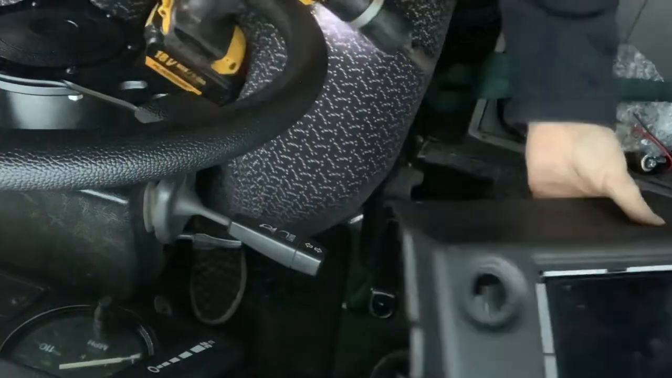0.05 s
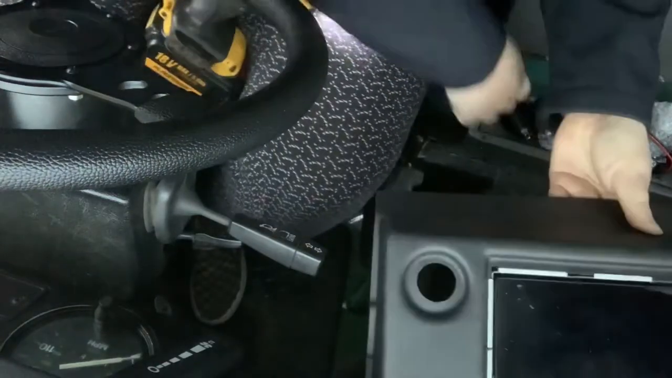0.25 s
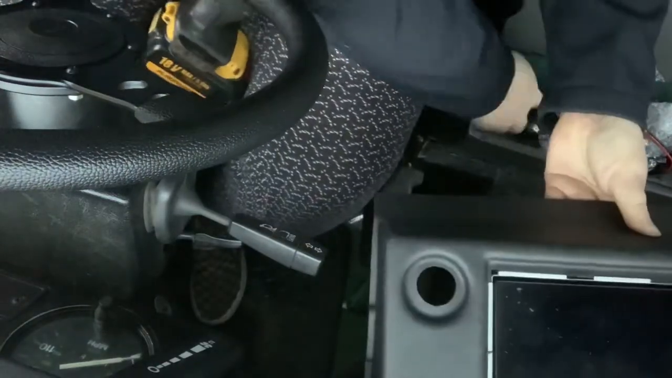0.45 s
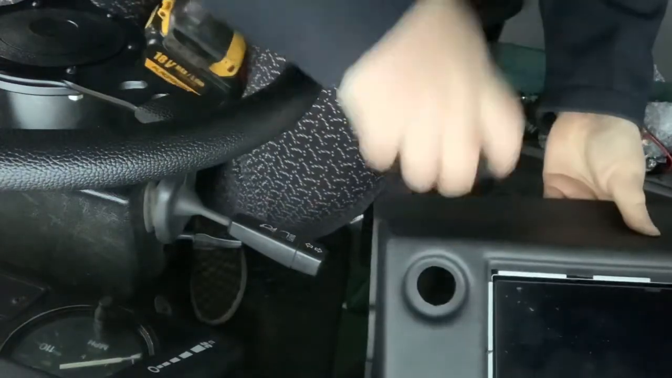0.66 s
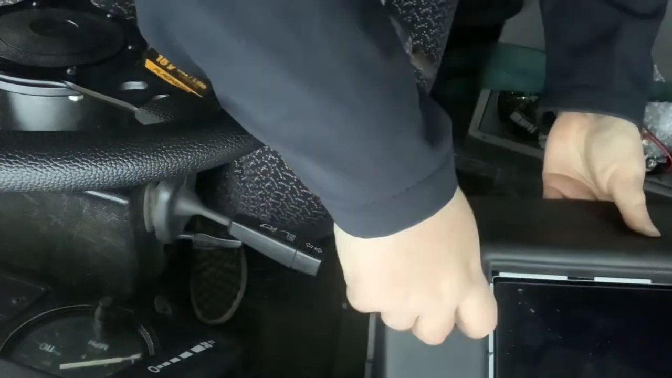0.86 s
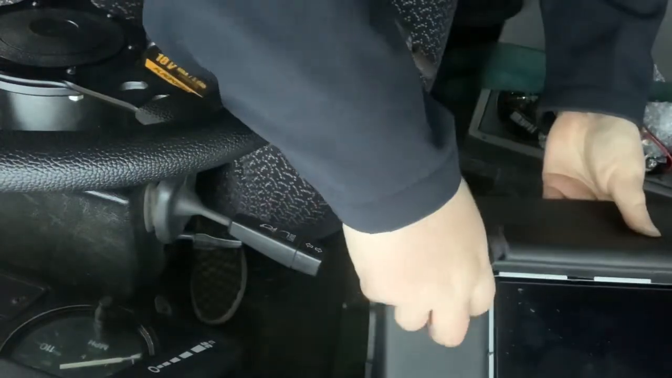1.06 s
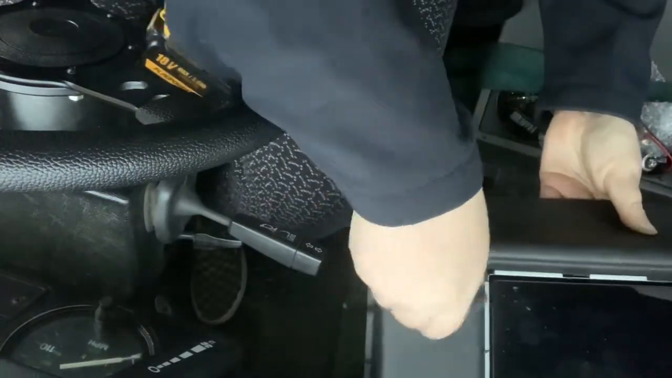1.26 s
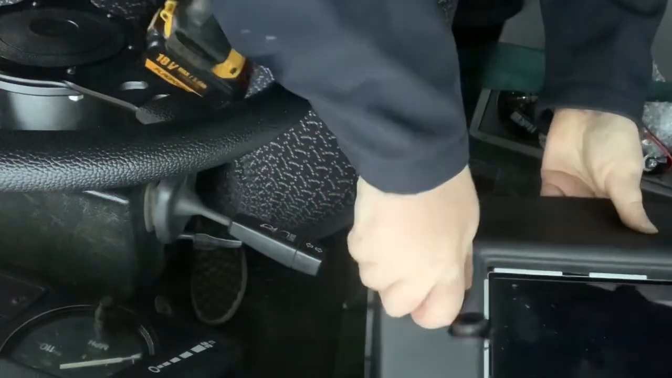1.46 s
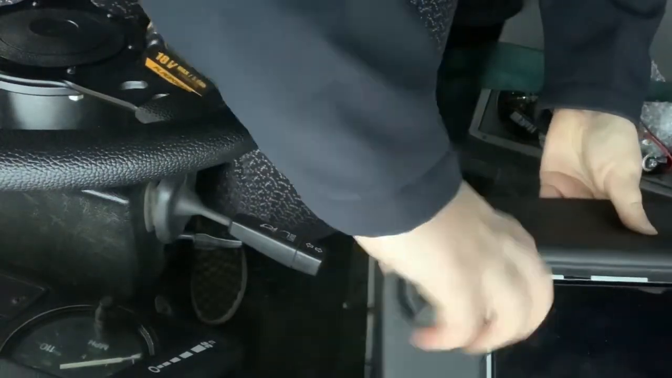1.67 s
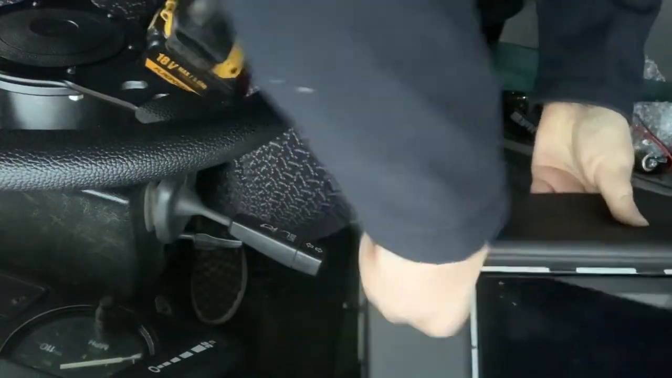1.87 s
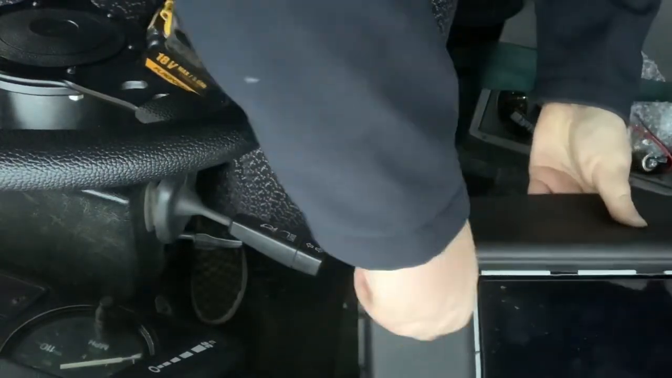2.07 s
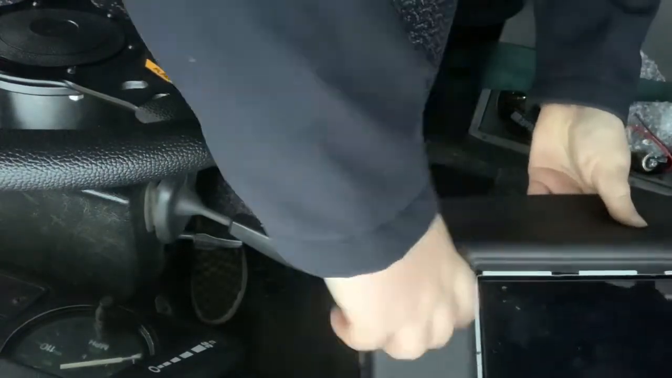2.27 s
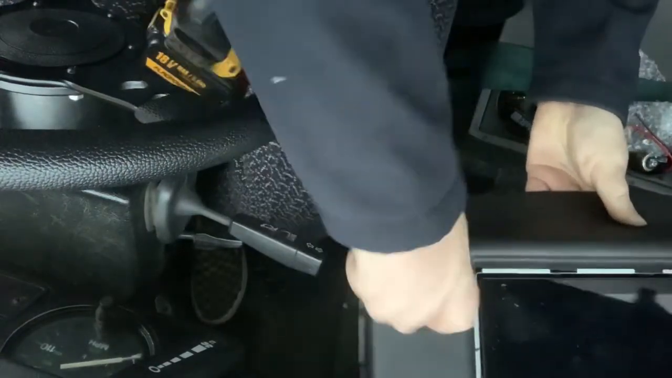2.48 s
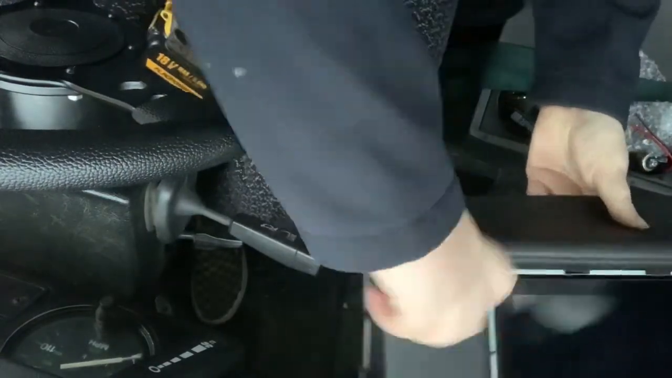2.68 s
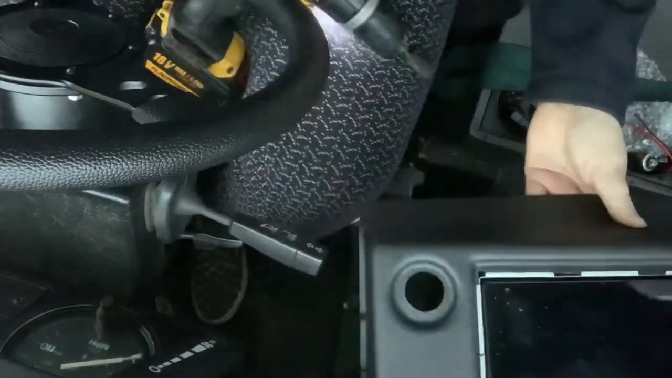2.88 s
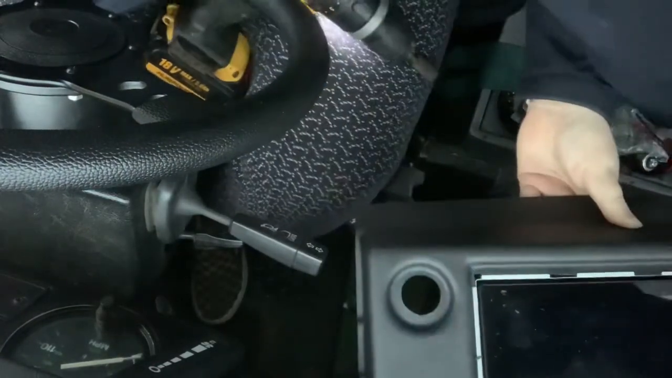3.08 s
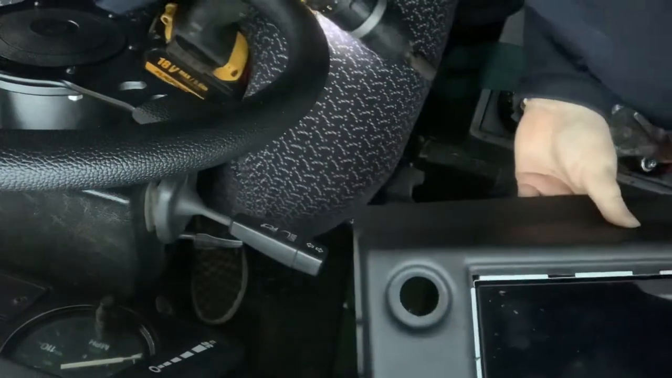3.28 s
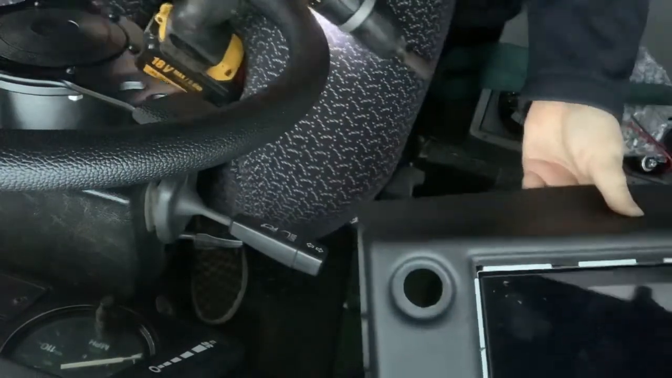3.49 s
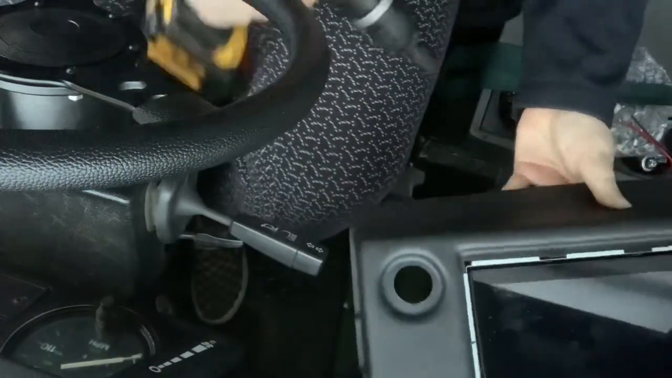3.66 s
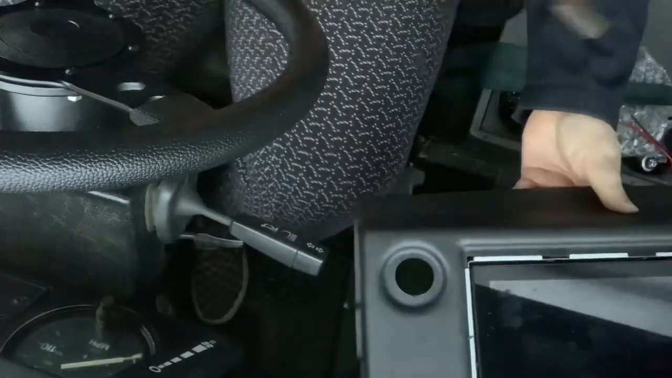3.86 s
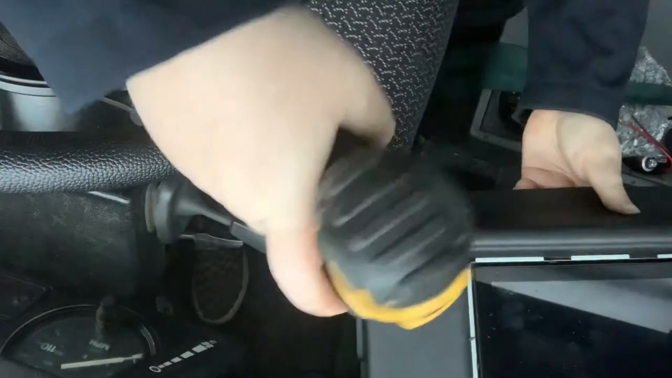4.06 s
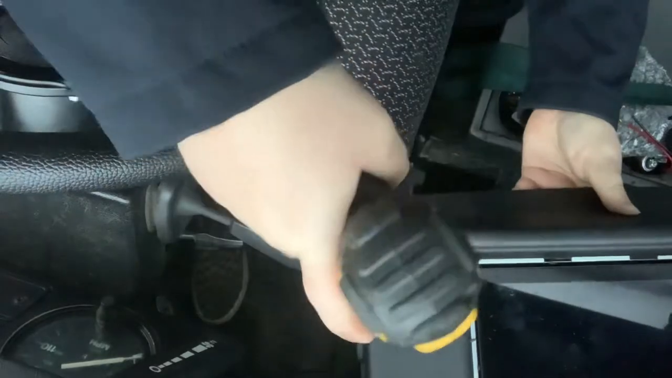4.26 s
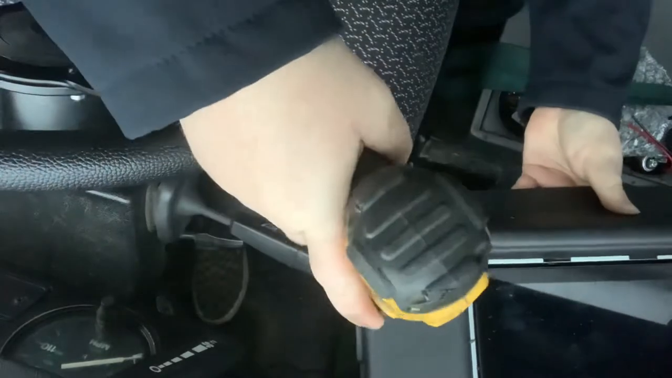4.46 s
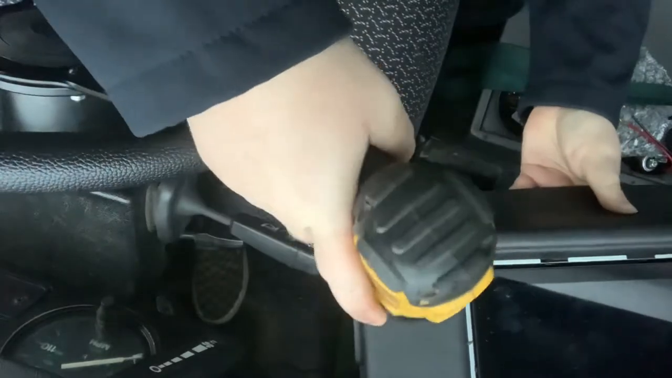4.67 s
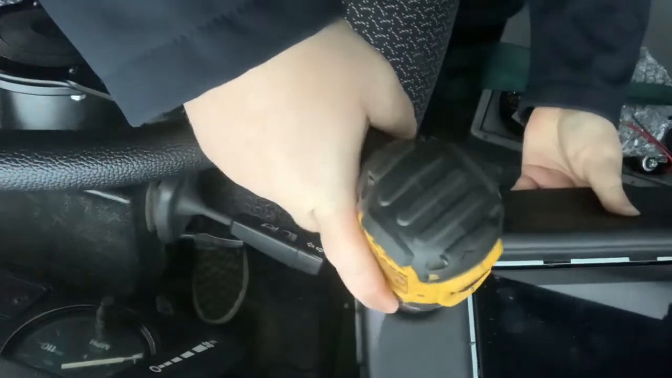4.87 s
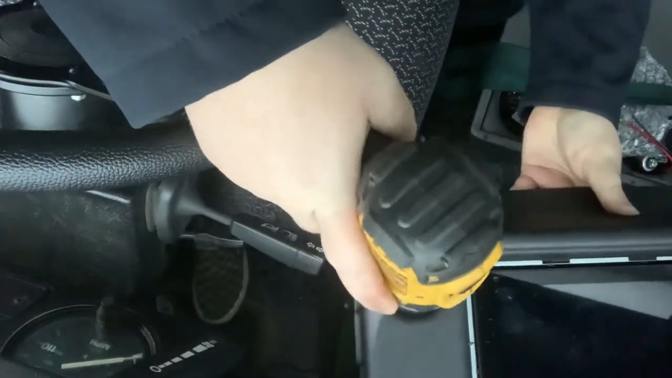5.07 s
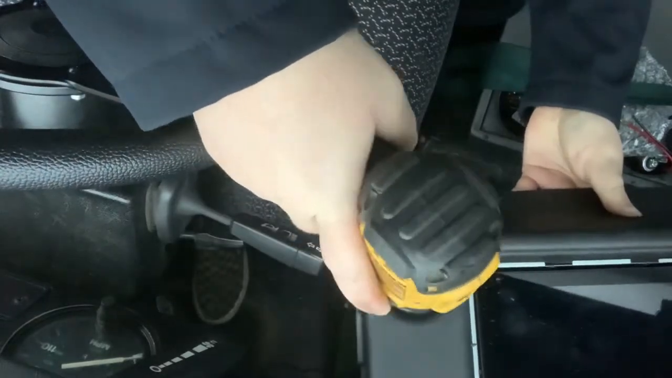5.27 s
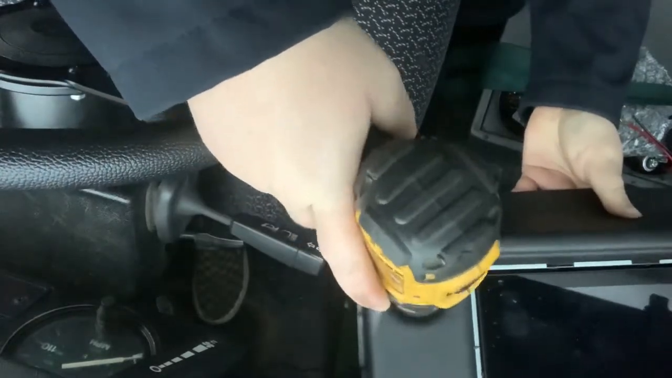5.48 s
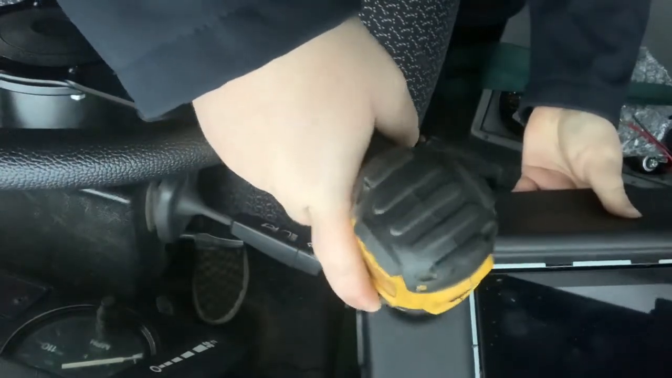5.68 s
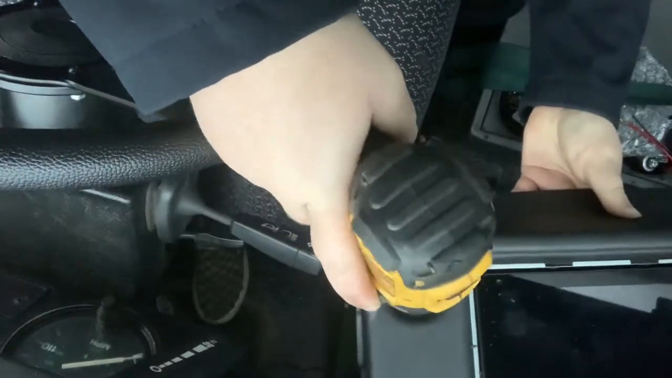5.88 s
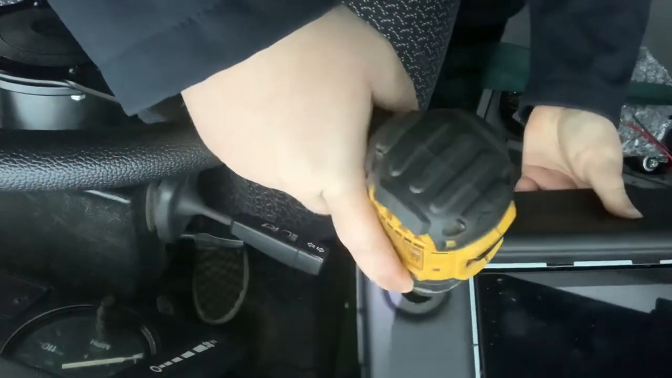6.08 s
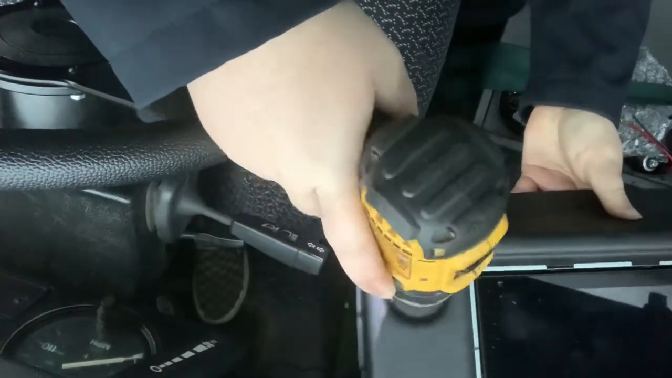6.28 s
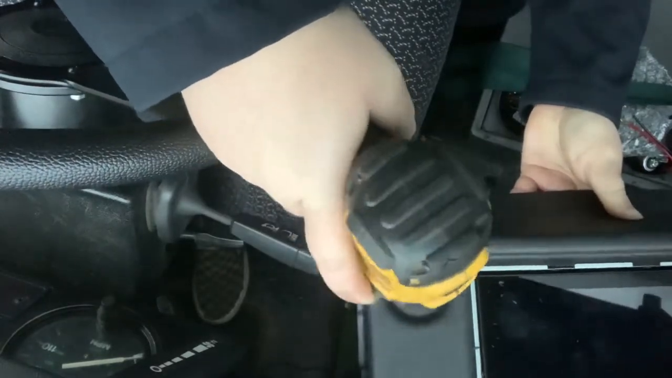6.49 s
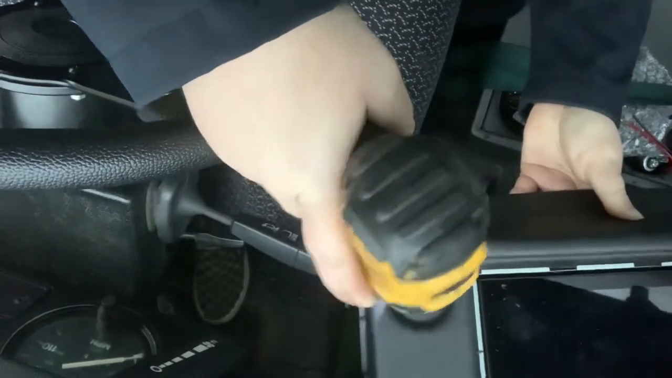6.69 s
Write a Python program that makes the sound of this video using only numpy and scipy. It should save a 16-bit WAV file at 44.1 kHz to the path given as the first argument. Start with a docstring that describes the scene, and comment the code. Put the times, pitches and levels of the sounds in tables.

```python
"""Cordless drill in a parked vehicle's cab.

A hand works at a plastic console panel: edges click, knuckles knock, skin rubs, a sleeve swishes.
A drill is lifted, bumps the steering wheel, is set on the panel and runs: its fan hisses, its gears
rasp in the housing and the bit chatters on the plastic. The small cab scatters the sound wide."""
import sys
import numpy as np
from scipy import signal
from scipy.fft import rfft, irfft, next_fast_len
from scipy.io import wavfile
from scipy.ndimage import uniform_filter1d, map_coordinates

SR = 44100
rng = np.random.default_rng(int(sys.argv[2]) if len(sys.argv) > 2 else 0)


def wav_record(signal):
    """Record a signal, one row per channel, as 16-bit PCM in the file named by sys.argv[1]."""
    frames = np.transpose(np.atleast_2d(signal))
    bounded = np.clip(frames, -1, 1)
    # unit amplitude maps onto the largest positive 16-bit level
    quanta = np.round(bounded * 32767).astype(np.int16)
    wavfile.write(sys.argv[1], SR, quanta)


N = 297229
TRIGGER_S, TOP_HZ = 4.336, 15740

# Each row: time in seconds, shaft turns per second. The motor sags under load.
MOTOR_SPEED = [(4.4, 279), (4.52, 279.3), (4.62, 277), (4.68, 277.8), (4.78, 275.5), (4.87, 278),
               (5.0, 278), (5.25, 274), (5.55, 274.8), (5.9, 275), (6.07, 272.3), (6.25, 274.3),
               (6.47, 272.3), (6.74, 272.8)]
def drill(run_up_s=0.033, rasp_db=2, rasp_per_s=240):
    """The motor turns fan and gears; tooth friction rings housing, gears, bit and console."""
    run_up = 1 - np.exp(-since(TRIGGER_S) / run_up_s)
    speed_hz = curve(MOTOR_SPEED) * run_up * (1 + 0.0014 * wobble(30) + 0.0018 * wobble(250))
    shaft = 2 * np.pi * np.cumsum(speed_hz) / SR
    carrier = shaft / 3 + wobble(16)  # the planet carrier rocks in its play
    teeth = grainy(500, 3.3)
    stick_slip = amp(rasp_db * wobble(rasp_per_s))
    rasp = unit(stick_slip * (1 + 0.13 * np.cos(carrier)) * (1 + 0.15 * np.cos(shaft + wobble(40))))
    motor = drive(-32, 0.12) * (fan(shaft) + housing(teeth, rasp, shaft, speed_hz[-1]))
    cutting = rasp * (gears(teeth) + grabs() + chatter(teeth)) + squeaks()
    return motor + bore() + waver(cutting + console(teeth, shaft) + bites())

# Each row: time in seconds, push on the bit in dB.
PUSH = [(4.37, -38.5), (4.47, -33.5), (4.57, -37), (4.76, -35), (4.84, -40.5), (4.9, -39.5), (5.0, -36.5),
        (5.05, -40.5), (5.1, -36.5), (5.21, -38), (5.3, -39), (5.66, -41), (5.8, -44.5), (5.87, -45),
        (6.0, -37), (6.08, -40), (6.24, -45.5), (6.37, -40), (6.46, -40), (6.51, -45.5), (6.61, -43.5),
        (6.68, -39.5)]
def drive(mean_push_db, db_per_db, unsteady_db=0):
    """Gain of a drill part, following the push on the bit."""
    return running() * amp(mean_push_db + db_per_db * about_mean(PUSH) + unsteady_db * wobble(9.2))

def running(rise_s=0.03):
    """0 before the trigger, 1 soon after."""
    return 1 - np.exp(-(since(TRIGGER_S) / rise_s) ** 2)

# Each row: frequency in Hz, noise density in dB.
FAN_SPECTRUM = [(15, -48), (25, -13), (199, -9.5), (268, -26), (652, -11), (1280, -7.5), (1600, -7),
                (2080, -4.5), (2720, -9), (3970, -9.5), (4300, -7), (5100, -7), (6280, -4), (6750, -7),
                (7500, -5), (9410, -7.5), (12300, -6), (14100, -6), (15700, -10.5)]
def fan(shaft):
    """Air hisses from the fan, pulsing faintly with each turn."""
    air = grainy(900, 0.41) * (1 + 0.014 * np.cos(shaft)) * amp(1.2 * wobble(50))
    return amp(3.5) * moving_echoes(coloured(air, FAN_SPECTRUM), bins=2, frames=10, calm_hz=11000)

# Each row: frequency in Hz, width in Hz, level in dB.
HOUSING_MODES = [(3040, 66, 2.5), (3340, 200, -5.5), (3696, 160, -1), (4480, 240, -1.5), (4980, 340, -2),
                 (5470, 310, -3), (6240, 160, -1.5), (7780, 530, -7)]
# Each row: multiple of shaft speed, level in dB.
WHINE_ORDERS = [(4.12, -23.5), (11, -18.5), (16.95, -14.5), (24.6, -35), (25.8, -21), (28.8, -19.5),
                (31.8, -30), (40.7, -32), (45.5, -26), (49.4, -24)]
def housing(teeth, rasp, shaft, final_speed_hz):
    """The housing whirrs with tooth friction; motor and teeth whine at multiples of shaft speed."""
    whirr = amp(-3.5) * rasp * resonate(teeth, HOUSING_MODES)
    whirr += amp(-13) * gear_mesh(shaft / (6 * np.pi), final_speed_hz / 3)
    return whirr * amp(0.56 * about_mean(PUSH)) + tones(shaft, WHINE_ORDERS) * amp(2.9 * wobble(10))

# Each row: frequency in Hz, level per line in dB.
MESH_SPECTRUM = [(1500, -23), (2500, -9), (3300, 5), (4200, -5), (5200, -4), (6300, 2), (7500, -11),
                 (10000, -38)]
def gear_mesh(turns, carrier_hz, spread_db=6, size=4096):
    """The same uneven teeth meet on every carrier turn: a dense comb of lines."""
    hz = np.arange(size // 2 + 1) * carrier_hz
    lines = amp(along(MESH_SPECTRUM, hz) + spread_db * rng.standard_normal(len(hz)))
    lines *= (hz > 0) & (hz < TOP_HZ)
    one_turn = irfft(lines * np.exp(2j * np.pi * rng.random(len(hz))))
    return unit(np.interp(turns, np.arange(size) / size, one_turn, period=1))

# Each row: frequency in Hz, width in Hz, level in dB.
LOW_GEAR_MODES = [(1879, 48, 0)]
HIGH_GEAR_MODES = [(2002, 62, -3), (2120, 100, -1.5), (2235, 190, -5.5)]
def gears(teeth):
    """Friction sustains two gear rings that grow with the push."""
    low = drive(-40.5, 0.6, unsteady_db=2) * sustained(teeth, LOW_GEAR_MODES, span_s=0.049)
    high = drive(-36.5, 0.63, unsteady_db=2) * sustained(teeth, HIGH_GEAR_MODES, span_s=0.037)
    return low + high

# Each row: middle in seconds, half length in seconds, pitch in Hz, level in dB, glide in Hz per second.
GRABS = [(4.4, 0.026, 1833, -30.5, 0), (4.455, 0.023, 2250, -34, 0), (4.461, 0.023, 2100, -25.5, -300),
         (4.524, 0.021, 2115, -26, -500), (4.594, 0.024, 2080, -28, -800), (4.66, 0.033, 2035, -37, -700),
         (4.697, 0.026, 2140, -28, 600), (4.743, 0.043, 1890, -26.5, -200),
         (4.784, 0.022, 2120, -28.5, -400), (4.891, 0.035, 2025, -25.5, -700),
         (4.99, 0.036, 1995, -39, -200), (5.087, 0.017, 2150, -26, -5000), (5.165, 0.041, 2005, -37, -700),
         (5.264, 0.026, 2095, -28, -500), (5.312, 0.018, 1860, -25.5, 1200), (5.41, 0.03, 2025, -31, -2),
         (5.51, 0.025, 2110, -29.5, -500), (5.534, 0.028, 1990, -33, -500), (5.628, 0.038, 2020, -29, 0),
         (5.718, 0.02, 1890, -31, 0), (5.915, 0.033, 1940, -31.5, 803), (5.995, 0.025, 2050, -29.5, -2500),
         (6.059, 0.027, 1925, -29, -2500), (6.323, 0.021, 2115, -32, 0), (6.381, 0.022, 2110, -25.5, -2200),
         (6.441, 0.017, 2060, -32.5, 0), (6.468, 0.024, 1875, -30.5, -1200),
         (6.552, 0.014, 2090, -30, -2000), (6.666, 0.016, 2140, -21.5, -5000),
         (6.722, 0.017, 1900, -29, -2500)]
def grabs(tremble_hz=27.2):
    """The bit grabs: the gear whine swells, trembles and mostly slides down."""
    out, t = np.zeros(N), np.arange(N) / SR
    tremble = tremble_hz * wobble(160)
    for s, half_s, hz, db, glide in GRABS:
        near = np.abs(t - s) < 3 * half_s
        age = t[near] - s
        phase = 2 * np.pi * np.cumsum(hz + glide * age + tremble[near]) / SR
        out[near] += np.sqrt(2) * amp(db) * np.exp(-(age / half_s) ** 2) * np.sin(phase)
    return out

# Each row: frequency in Hz, width in Hz, level in dB. Main mode first.
BIT_MODES = [(3982, 48, 1), (3740, 120, -10.5), (6300, 230, -9.5), (13600, 280, -18)]
# Each row: time in seconds, squeak peak in dB.
CATCHES = [(4.49, -25), (4.5138, -22), (4.522, -28), (4.534, -23.5), (4.592, -24), (4.868, -32),
           (4.885, -20), (4.903, -21), (4.92, -23.5), (5.091, -25), (5.1213, -20.5), (5.392, -31),
           (5.4058, -26), (5.5084, -24.5), (5.622, -18), (5.9862, -22), (6.334, -27), (6.375, -26.5)]
def chatter(teeth, surge_db=-11, half_s=0.042):
    """The bit rings with the push and surges around each catch."""
    surges = np.sqrt(sum((amp(db + surge_db) * swell(s, half_s)) ** 2 for s, db in CATCHES))
    gain = np.hypot(drive(-38.5, 0.84, unsteady_db=2), surges)
    return gain * sustained(teeth, BIT_MODES, span_s=0.042)

def squeaks(rise_s=0.0042):
    """At each catch the bit sticks for a few milliseconds and sings at its main mode."""
    out, t = np.zeros(N + SR), np.arange(SR // 20) / SR
    envelope = (t / rise_s) ** 2 * np.exp(2 - 2 * t / rise_s)
    for s, db in CATCHES:
        hz = BIT_MODES[0][0] * rng.normal(1, 0.0069)
        out[round(s * SR):][:len(t)] += amp(db) * envelope * np.sin(2 * np.pi * hz * t)
    return out[:N]

# Each row: frequency in Hz, width in Hz, level in dB.
CONSOLE_MODES = [(255, 63, 1.5), (356, 35, 3.5), (459, 43, 2), (566, 39, -5), (745, 44, -4.5)]
# Each row: multiple of shaft speed, level in dB.
HUM_ORDERS = [(1, -12), (2, -20), (3, -18.5)]
def console(teeth, shaft):
    """The pressed drill shakes the console, which rings and hums."""
    ring = amp(-4.5) * sustained(teeth, CONSOLE_MODES, span_s=0.12)
    hum = tones(shaft, HUM_ORDERS) * amp(5.9 * wobble(22))
    return drive(-41, 1) * (ring + hum)

# Each row: start in seconds, length in seconds, pitch in Hz, level in dB.
BITES = [(4.36, 0.035, 848, -40.5), (4.413, 0.036, 341, -37), (4.457, 0.087, 816, -39),
         (4.46, 0.087, 736, -39), (4.597, 0.08, 730, -39.5), (4.684, 0.019, 355, -34.5),
         (4.76, 0.06, 473, -42), (4.863, 0.063, 276, -46), (4.998, 0.13, 277.4, -39),
         (5.295, 0.064, 490, -41.5), (5.391, 0.026, 253.5, -34), (5.95, 0.21, 274, -42.5)]
def bites():
    """The panel sings briefly as the bit bites."""
    t = np.arange(N) / SR
    return sum(amp(db) * burst(s, length) * np.sin(2 * np.pi * hz * t) for s, length, hz, db in BITES)

# Each row: time in seconds, level in dB.
BORE_LEVEL = [(4.4, -64), (5.85, -62), (6.05, -42), (6.4, -45.5), (6.74, -45.5)]
# Each row: frequency in Hz, noise density in dB.
BORE_SPECTRUM = [(100, -7), (350, -7), (600, 0.5), (1100, 0), (1500, -12), (3000, -33)]
def bore():
    """The flutes scrape the wall of the deepening hole."""
    return running() * amp(curve(BORE_LEVEL)) * coloured(grainy(240, 2.5), BORE_SPECTRUM)

def waver(x, sway_s=0.0001, per_s=16):
    """Changing pressure on the bit bends the pitch of the rings."""
    n = np.arange(N)
    return np.interp(n + SR * sway_s * wobble(per_s), n, x)

# Each row: start in seconds, level in dB, hardness in dB per octave, spot pitch in Hz.
KNOCKS = [(0.168, -29, 0.5, 766), (0.177, -38, -5, 560), (0.211, -44.5, -4, 1610), (0.389, -45, -4, 2480),
          (0.421, -54, -2, 1890), (1.094, -56.5, -1.5, 1500), (1.472, -45, -1, 1870),
          (1.94, -47.5, -2, 2070), (1.975, -47, -7, 1300), (2.005, -48, -1.5, 2170),
          (2.106, -41, -10.5, 458), (2.471, -47.5, -6.5, 780), (2.513, -53, -6, 1490),
          (2.561, -56, 1, 1450), (2.572, -54.5, -1, 700), (2.663, -46.5, -6, 850), (2.695, -49, 0.5, 1750),
          (2.721, -35, -1.5, 966), (2.73, -39, -7, 624), (2.778, -32, -1.5, 600), (3.035, -43, -1.5, 1800),
          (3.41, -51, 0, 1090), (3.534, -60, 5, 1480), (3.673, -47, -2.5, 1470), (3.7, -32.5, -0.3, 4440),
          (3.737, -31, 1.5, 1670), (3.743, -34.5, -1, 1060), (4.222, -55, -4, 824), (4.266, -39, 2.5, 980),
          (4.302, -59, 2, 1870)]
# Each row: start in seconds, level in dB.
THUDS = [(0.356, -34), (0.384, -47), (0.836, -41), (1.303, -46), (1.471, -42), (1.879, -37), (1.976, -38.5),
         (2.122, -36), (2.565, -39), (3.701, -24.5), (3.738, -26), (3.772, -27), (3.829, -29), (3.846, -29),
         (4.267, -27), (4.301, -37.5)]
# Each row: frequency in Hz, gain in dB.
KNOCK_COLOUR = [(280, -8), (600, -1.5), (2200, 4), (4200, -0.5), (9000, -5)]
THUD_COLOUR = [(150, 0), (280, -3.5), (560, -24.5), (2200, -22.5), (4200, -29), (9000, -44)]
def knocks(pivot_hz=600, thud_spot_hz=1610):
    """Knuckles and tool knock, heavy or soft things thud; the light panel radiates little deep bass."""
    out, blows = np.zeros(N + SR), []
    for s, db, hardness, spot_hz in KNOCKS:
        tilted = [(hz, gain_db + hardness * np.log2(hz / pivot_hz)) for hz, gain_db in KNOCK_COLOUR]
        blows.append((s, db, tilted, spot_hz))
    blows += [(s, db, THUD_COLOUR, thud_spot_hz) for s, db in THUDS]
    for s, db, colour, spot_hz in blows:
        blow = panel_blow(colour, spot_hz)
        out[round(s * SR):][:len(blow)] += amp(db) * blow
    bass_cut = [(30, -21), (70, -12), (140, -2.5), (230, 0)]
    return filtered(out[:N], lambda hz: amp(along(bass_cut, hz)))

# Each row: frequency in Hz, level in dB, T60 in seconds.
PANEL_MODES = [(161, -9.5, 0.11), (211.3, -6, 0.11), (272, -0.5, 0.14), (329.4, 0.5, 0.11),
               (470, 0.5, 0.12), (590, -6, 0.079), (803, -3.5, 0.062), (980, -11, 0.025),
               (1440, -5.5, 0.052), (1544, -11, 0.11), (1884, -5, 0.058), (2143, 7.5, 0.014),
               (2550, -6, 0.04), (3090, -9.5, 0.035), (3610, 6, 0.016), (5340, 13.5, 0.013),
               (6340, 12, 0.015)]
# Each row: frequency in Hz, noise density in dB.
CRACK_SPECTRUM = [(100, -10), (400, 14), (1000, 3), (2500, -7), (5000, 0), (9000, -6.5), (16000, -11)]
def panel_blow(colour, spot_hz, give_s=0.0037, spot_db=15.5, ripple_hz=548):
    """The hollow panel gives, then rings and cracks; the struck spot adds its own pitch."""
    t = np.arange(SR // 8) / SR
    ripple_db = -1.5 * rng.standard_normal(64)  # from nearby surfaces
    def crack_gain(f):
        spot = spot_db * np.exp(-((f / spot_hz - 1) / 0.076) ** 2)
        ripple = np.interp(f / ripple_hz, np.arange(64), ripple_db) * f / (f + 900)
        return amp(along(colour, f) + spot + ripple + along(CRACK_SPECTRUM, f))
    hz, db, t60_s = np.transpose(PANEL_MODES)
    gains = amp(db + along(colour, hz) + rng.normal(0, 3.57, len(hz)))
    pitch_hz = hz * (1 + rng.normal(0, 0.031, len(hz)))  # hand pressure shifts the modes
    phase = 2 * np.pi * (pitch_hz[:, None] * t + rng.random((len(hz), 1)))
    ring = gains @ (np.sin(phase) * decay(t, t60_s[:, None]))
    noise = filtered(rng.standard_normal(len(t)), crack_gain)
    crack = noise * (decay(t, 0.021) + amp(-19) * decay(t, 0.11))
    return (amp(1.5) * ring + amp(18.5) * crack) * (1 - np.exp(-(t / give_s) ** 2))

# Each row: start in seconds, level in dB, brightness in dB per octave, three edge pitches in Hz.
CLICKS = [(0.465, -54, 9, 2520, 4970, 7000), (0.738, -37, 1, 2254, 3500, 6000),
          (0.768, -48, -6, 2160, 3440, 5600), (0.807, -39, -2, 1910, 2700, 3750),
          (0.822, -46.5, 1, 2200, 4230, 6460), (0.947, -69, 9, 2240, 5740, 7100),
          (1.044, -39.5, -0.5, 3460, 3570, 4600), (1.111, -59, -5, 2120, 3300, 6000),
          (1.176, -57, -0.5, 2190, 3050, 4540), (1.223, -41, 0.5, 1920, 4710, 5030),
          (1.244, -49.5, -1.5, 2190, 3540, 6700), (1.335, -59, -3, 2140, 3600, 5030),
          (1.42, -39, 3, 3600, 4950, 5200), (1.472, -44.5, -3.5, 1900, 3600, 5020),
          (1.879, -37.5, 0, 2430, 3370, 4590), (1.976, -44.5, -1, 2280, 3490, 5230),
          (2.182, -44, -3.5, 2280, 3370, 4900), (2.245, -48.5, -3.5, 1920, 3370, 5300),
          (2.304, -48.5, -2.5, 2140, 3600, 4520), (2.424, -56.5, 5, 2080, 4200, 5800),
          (2.496, -58.5, 8, 3600, 7000, 12500), (2.602, -49.5, -6, 1970, 3800, 4540),
          (2.757, -23.5, 4.5, 2010, 3690, 6030), (2.768, -27, -1, 2290, 3020, 5020),
          (3.26, -30.5, 1, 2500, 3510, 4670), (3.914, -56, 2, 2200, 2740, 4400),
          (3.995, -58.5, 3, 3030, 4430, 5960)]
# Each row: frequency in Hz, noise density in dB.
CLICK_SPECTRUM = [(100, -27), (260, -7), (500, -3), (900, -1.5), (1400, -4.5), (2100, 5.5), (2700, -1),
                  (3600, 1.5), (5200, 0), (7000, -0.5), (9000, -12), (15000, -16.5)]
def clicks(give_s=0.0039, pivot_hz=3500):
    """A hard edge gives and snaps: a dry tick and a short ring at its own pitches."""
    out, t = np.zeros(N + SR), np.arange(SR // 10) / SR
    give = 1 - np.exp(-(t / give_s) ** 2)
    tick_decay = decay(t, 0.019) + amp(-24) * decay(t, 0.081)  # snap, then the cab's echo
    fixed_energy = lambda x: x / np.sqrt(np.sum(x ** 2) / (SR // 100))
    for s, db, brightness, *pitches in CLICKS:
        tilt_db = lambda f: brightness * np.log2(np.maximum(f, 500) / pivot_hz)
        noise = filtered(rng.standard_normal(len(t)), lambda f: amp(along(CLICK_SPECTRUM, f) + tilt_db(f)))
        tick = amp(-1.5) * fixed_energy(noise * give * tick_decay)
        modes = sum(np.sin(2 * np.pi * (hz * t + rng.random())) for hz in pitches)
        ring = amp(-4.5) * fixed_energy(modes * give * decay(t, 0.026))
        out[round(s * SR):][:len(t)] += amp(db) * (tick + ring)
    return out[:N]

# Each row: middle in seconds, peak in dB, pitch in Hz, half length in seconds.
THUMPS = [(3.745, -11, 264, 0.0029), (4.276, -27.5, 360, 0.0037)]
def thumps(cab_hz=268, cab_db=5, cab_t60_s=0.11):
    """The heavy drill swings the panel; the cab's cross mode rings on, opposite at the two ears."""
    t = np.arange(N) / SR
    push, across = np.zeros(N), np.zeros(N)
    for s, db, hz, half_s in THUMPS:
        push += amp(db) * swell(s, half_s) * np.cos(2 * np.pi * hz * (t - s))
        age = since(s - half_s)
        envelope = decay(age, cab_t60_s) * (1 - np.exp(-age / half_s))
        across += amp(db + cab_db) * envelope * np.sin(2 * np.pi * cab_hz * (s - t))
    return np.array([push + across, push - across])

# Each row: frequency in Hz, level in dB, T60 in seconds.
WHEEL_MODES = [(174, -42, 0.63), (238, -24.5, 0.29), (277.5, -32, 0.3)]
def steering_wheel(bump_s=3.745, rise_s=0.028):
    """The bumped wheel's low modes build up and die away."""
    t = since(bump_s)
    modes = sum(amp(db) * decay(t, t60) * np.sin(2 * np.pi * hz * t) for hz, db, t60 in WHEEL_MODES)
    return modes * (1 - np.exp(-(t / rise_s) ** 2))

# Each row: time in seconds, rubbing effort in dB.
GRIP = [(0.0, -47.5), (0.17, -53.5), (0.8, -54.5), (0.89, -61.5), (1.0, -58), (1.1, -57.5), (1.68, -53.5),
        (2.66, -53.5), (2.78, -57.5), (3.45, -54), (3.76, -58), (4.16, -56.5), (4.3, -47)]
# Each row: middle in seconds, half length in seconds, level in dB.
SWISHES = [(0.046, 0.062, -54), (0.275, 0.24, -58), (0.613, 0.038, -53), (1.322, 0.026, -63),
           (1.593, 0.14, -67), (1.942, 0.13, -69.5), (2.187, 0.054, -67), (2.473, 0.16, -65.5),
           (2.997, 0.1, -51.5), (3.398, 0.045, -48.5), (3.527, 0.13, -49.5), (3.81, 0.24, -59)]
# Each row: start in seconds, length in seconds, level in dB.
SLIDES = [(0.004, 0.099, -47.5), (0.138, 0.053, -39.5), (0.59, 0.041, -73), (0.75, 0.04, -52.5),
          (1.022, 0.035, -61), (1.078, 0.039, -63), (1.899, 0.13, -56), (2.075, 0.036, -58),
          (2.221, 0.068, -57.5), (2.688, 0.061, -47), (3.021, 0.034, -51.5), (3.256, 0.011, -39.5),
          (3.392, 0.044, -60), (4.262, 0.012, -50)]
# Each row: frequency in Hz, noise density in dB.
RUB_SPECTRUM = [(18, -86), (30, -44), (135, -12), (167, -0.5), (260, 2.5), (642, -18), (779, -20),
                (981, -20), (1120, -28.5), (2160, -35.5), (2430, -36), (3000, -67), (3900, -54),
                (6600, -120)]
SCRAPE_SPECTRUM = [(60, -39), (300, -12), (800, 3.5), (2000, 2.5), (3000, -2), (5000, -0.5), (7500, -5.5),
                   (10000, -11.5), (16000, -17)]
SLEEVE_SPECTRUM = [(290, -19), (500, 0.5), (697, -13), (1040, -7.5), (1190, -13), (1500, -6.5), (2420, -12),
                   (5420, -3), (9260, -13.5), (13700, -11), (15800, -14.5)]
def handling():
    """Fingers rub the console and snag on its grain, a sleeve swishes, skin and cuff slide."""
    grip_db = about_mean(GRIP)
    rub = amp(-55.5 + grip_db) * (1 - running())
    sleeve = amp(-88) + sum(amp(db) * swell(s, half_s) for s, half_s, db in SWISHES)
    slide = sum(amp(db) * burst(s, length_s) for s, length_s, db in SLIDES)
    hollow = amp(1.5) * coloured(grainy(70, 2.1), RUB_SPECTRUM)
    skin = amp(-16.5) * coloured(grainy(240, 2.7), SCRAPE_SPECTRUM)
    snags = (amp(-25 + 0.58 * grip_db) * rub + amp(-9.5) * np.hypot(sleeve, slide)) * crackle()
    cloth = coloured(grainy(200, 1.6), SLEEVE_SPECTRUM)
    cloth = amp(1) * moving_echoes(cloth, bins=4, frames=5, calm_hz=14000)
    scrape = coloured(grainy(400, 1.7), SCRAPE_SPECTRUM)
    return rub * (hollow + skin) + snags + sleeve * cloth + slide * scrape

def crackle(per_s=84, spread_db=8, t60_s=0.021):
    """Tiny random snags of skin and cloth, very unequal in size, at rms 1."""
    starts = (rng.random(N) < per_s / SR) * amp(spread_db * np.clip(rng.standard_normal(N), -2, 2))
    envelope = signal.fftconvolve(starts, decay(np.arange(SR // 100) / SR, t60_s))[:N]
    return coloured(rng.standard_normal(N) * envelope, SCRAPE_SPECTRUM)

def moving_echoes(x, bins, frames, calm_hz, depth_db=3):
    """Echoes off moving hands and tool lift some pitches and sink others, least in bass and top."""
    hz, _, spectrum = signal.stft(x, SR, nperseg=512)
    field = rng.standard_normal(spectrum.shape)
    for _ in range(2):
        field = uniform_filter1d(uniform_filter1d(field, bins, axis=0), frames, axis=1)
    reach = hz / np.hypot(hz, 900) / (1 + (hz / calm_hz) ** 2)
    spectrum *= amp(depth_db * reach[:, None] * unit(field))
    return unit(signal.istft(spectrum, nperseg=512)[1][:N])

# Each row: frequency in Hz, share reaching the right ear first (negative: the left).
EAR_LAG = [(150, -0.25), (330, -0.65), (600, 1), (1100, 0), (2000, 0.75), (4500, 0.67), (6300, 0.0091),
           (8000, -.3), (11000, 0.13)]
def cab(source, width, lean):
    """Stereo from a direct sound plus scattered sound of like strength but unrelated detail."""
    direct, scattered = source(), source()
    size = lambda hz: amp(along(width, hz))
    balance = lambda hz: np.tanh(np.log(amp(along(lean, hz))))
    pan = lambda hz: np.clip(balance(hz) * (size(hz) + 1 / size(hz)) / 2, -0.9, 0.9)
    unpanned = lambda hz: size(hz) * np.sqrt(1 - pan(hz) ** 2)
    lag = lambda hz: np.clip(along(EAR_LAG, hz), -1, 1)
    side = filtered(direct, lambda hz: size(hz) * pan(hz) - 1j * unpanned(hz) * lag(hz))
    side += filtered(scattered, lambda hz: unpanned(hz) * np.sqrt(1 - lag(hz) ** 2))
    return np.array([direct + side, direct - side])

def amp(db):
    """Decibels to gain."""
    return 10 ** (np.asarray(db) / 20)

def unit(x):
    """x at rms 1."""
    return x / np.sqrt(np.mean(x ** 2) + 1e-20)

def decay(t, t60_s):
    """A fall of 60 dB every t60_s."""
    return amp(-60 * t / t60_s)

def since(s):
    """Seconds elapsed after s, 0 before."""
    return np.maximum(np.arange(N) / SR - s, 0)

def along(points, hz):
    """(Hz, value) points read on a log axis."""
    f, value = np.transpose(points)
    return np.interp(np.log(hz + 1), np.log(f + 1), value)

def curve(rows):
    """(seconds, value) rows read per sample."""
    return np.interp(np.arange(N) / SR, *np.transpose(rows))

def about_mean(rows):
    """A (seconds, dB) curve less its mean."""
    s, db = np.transpose(rows)
    return curve(rows) - np.interp(np.linspace(s[0], s[-1]), s, db).mean()

def swell(s, half_s):
    """A smooth rise and fall around s."""
    return np.exp(-np.minimum(((np.arange(N) / SR - s) / half_s) ** 2, 50))

def burst(s, length_s):
    """A window with sloping sides, opening at s."""
    return np.interp(np.arange(N) / SR, s + length_s * np.array([-0.1, 0.25, 0.75, 1.1]), [0, 1, 1, 0])

def wobble(per_s):
    """A smooth random curve, per_s knots a second."""
    knots = rng.standard_normal(int(N * per_s / SR) + 4)
    steps = np.arange(0, len(knots), 1 / 4)
    return np.interp(np.arange(N) * per_s / SR, steps, map_coordinates(knots, [steps]))

def grainy(per_s, depth_db):
    """Friction noise whose strength jumps per_s times a second."""
    return unit(rng.standard_normal(N) * amp(depth_db * wobble(per_s)))

def tones(shaft, orders):
    """Sines locked to the shaft angle."""
    return np.sqrt(2) * sum(amp(db) * np.sin(order * shaft) for order, db in orders)

def filtered(x, response):
    """x through a complex frequency response."""
    size = next_fast_len(len(x) + 8192)
    return irfft(rfft(x, size) * response(np.fft.rfftfreq(size, 1 / SR)), size)[:len(x)]

def coloured(x, spectrum):
    """x shaped by a spectrum, at rms 1."""
    return unit(filtered(x, lambda hz: amp(along(spectrum, hz))))

def resonate(x, modes):
    """x through resonances of alternating sign, at rms 1."""
    def response(f):
        return sum((-1) ** k * amp(db) * 1j * f * width / (hz * hz - f * f + 1j * f * width)
                   for k, (hz, width, db) in enumerate(modes))
    return unit(filtered(x, response))

def sustained(friction, modes, span_s):
    """Friction rings the modes and holds them near a steady size over span_s."""
    ring = resonate(friction, modes)
    power = np.abs(uniform_filter1d(ring ** 2, int(span_s * SR)))
    return unit(ring / np.sqrt(power + 0.1))

# Each row: frequency in Hz, side over mid in dB.
HAND_WIDTH = [(60, 1), (130, -5), (260, -1.5), (600, 6), (1200, 2.5), (2400, 2.5), (4400, 3.5), (8000, 1),
              (15000, 0)]
DRILL_WIDTH = [(60, -17), (95, -21), (150, -10), (240, 3.5), (380, 7.5), (600, 0), (950, -1.5),
               (1500, -2.5), (2380, 2.5), (3770, 2.5), (5980, 3), (9470, 2.5), (15000, -1.5)]
# Each row: frequency in Hz, left over right in dB.
HAND_LEAN = [(60, 9), (200, 8.5), (380, 4.5), (700, 4.5), (1300, 2.5), (2400, 1), (4400, 2.5), (8000, 1.5),
             (15000, -2)]
DRILL_LEAN = [(60, 0.5), (110, 0.5), (200, 2.5), (380, -0.5), (700, 1.5), (1290, 2.5), (2380, 2), (4400, 1),
              (8120, 1.5), (15000, -1.5)]
def scene():
    """Hand work, then the drill, both inside the cab."""
    hand = lambda: knocks() + clicks() + handling() + steering_wheel()
    return cab(hand, HAND_WIDTH, HAND_LEAN) + thumps() + cab(drill, DRILL_WIDTH, DRILL_LEAN)

def record(dry):
    """A steep low-pass at TOP_HZ."""
    low_pass = lambda hz: (1 - np.tanh((hz - TOP_HZ) / 90)) / 2
    return np.array([filtered(channel, low_pass) for channel in dry])

dry = scene()
out = record(dry)
wav_record(out)
```